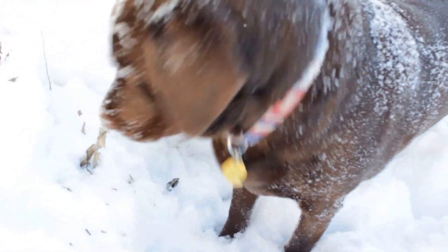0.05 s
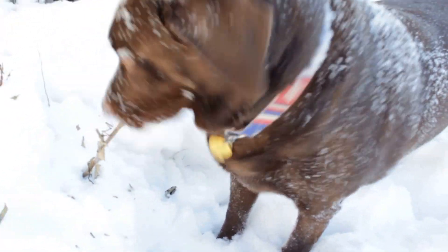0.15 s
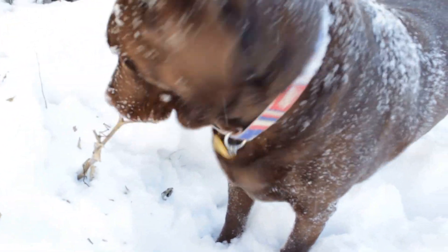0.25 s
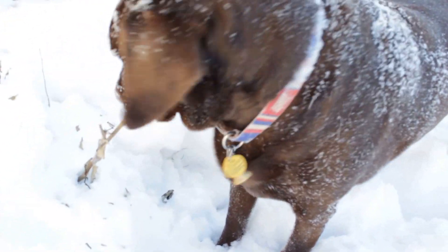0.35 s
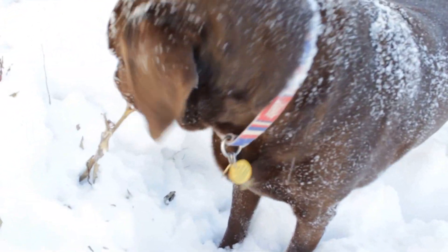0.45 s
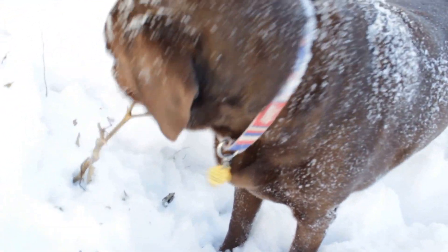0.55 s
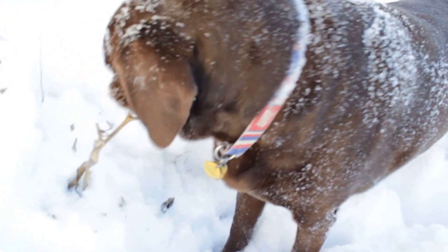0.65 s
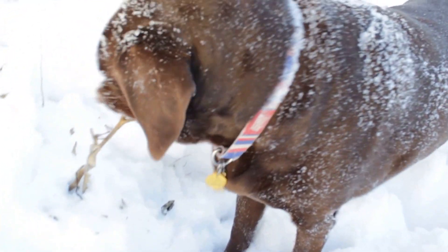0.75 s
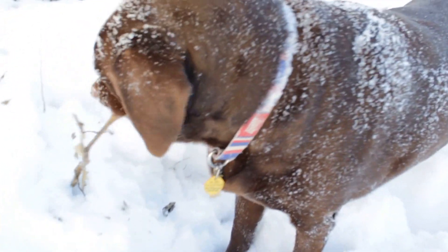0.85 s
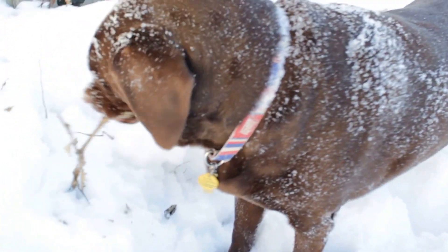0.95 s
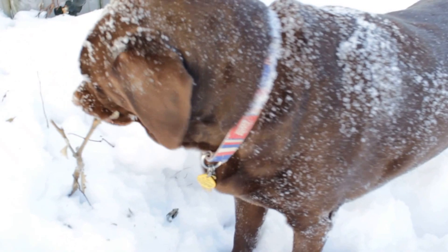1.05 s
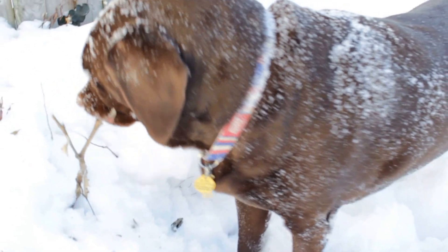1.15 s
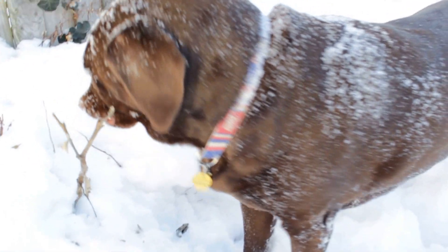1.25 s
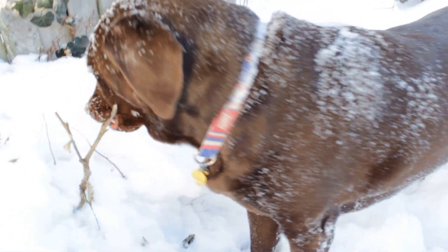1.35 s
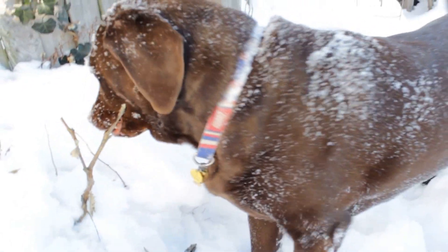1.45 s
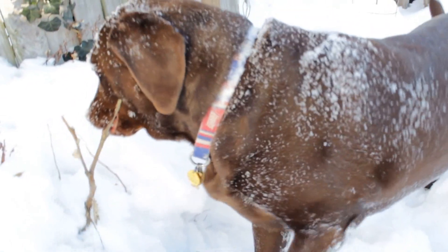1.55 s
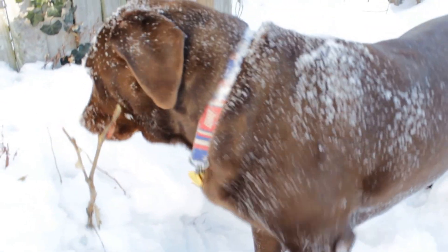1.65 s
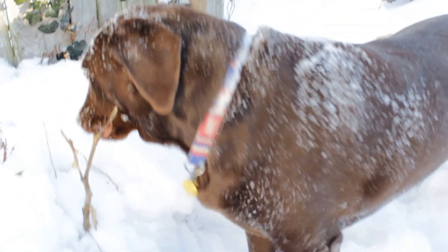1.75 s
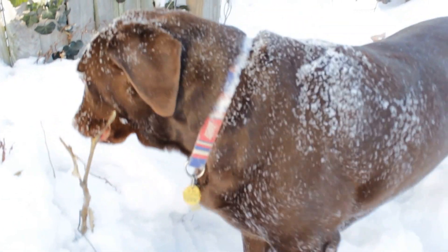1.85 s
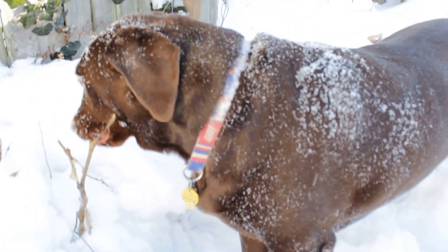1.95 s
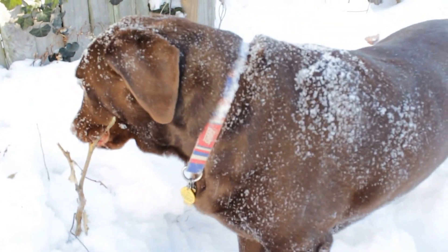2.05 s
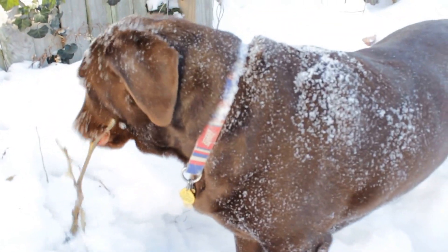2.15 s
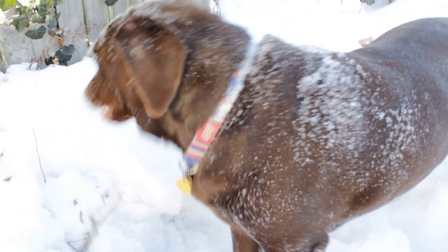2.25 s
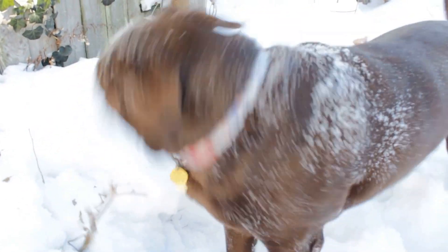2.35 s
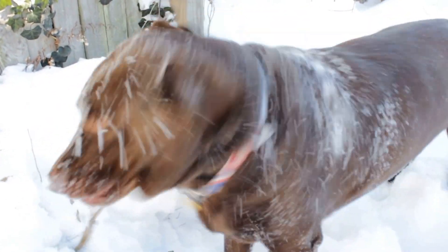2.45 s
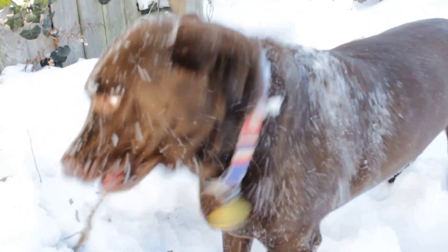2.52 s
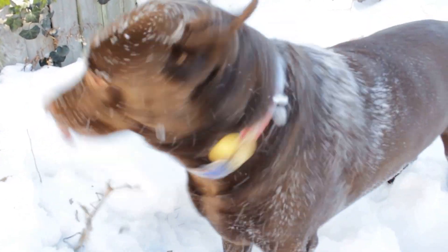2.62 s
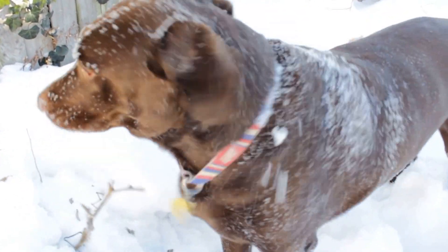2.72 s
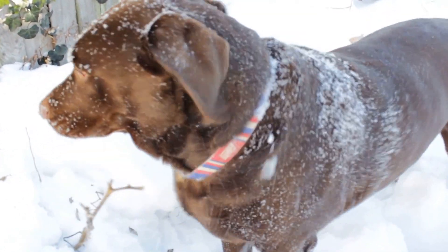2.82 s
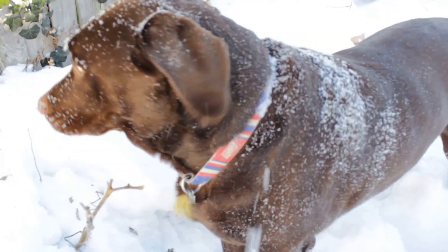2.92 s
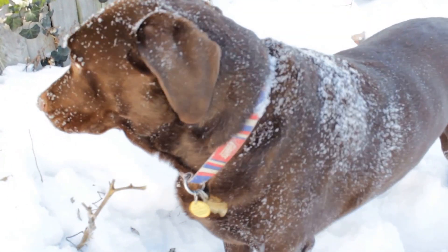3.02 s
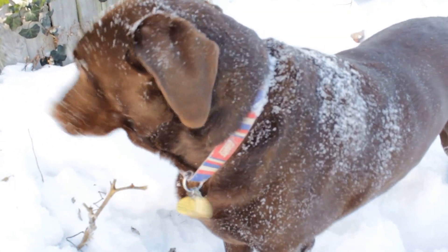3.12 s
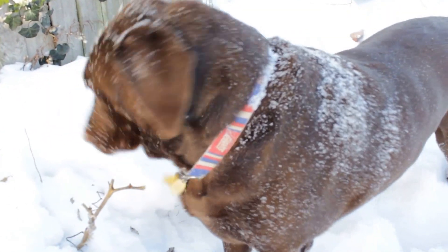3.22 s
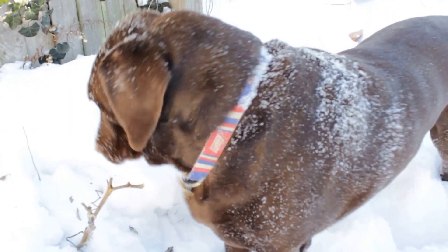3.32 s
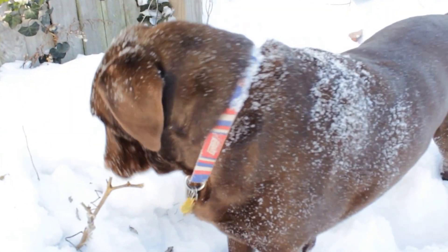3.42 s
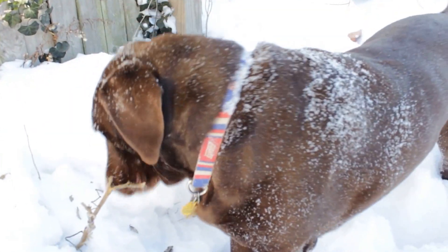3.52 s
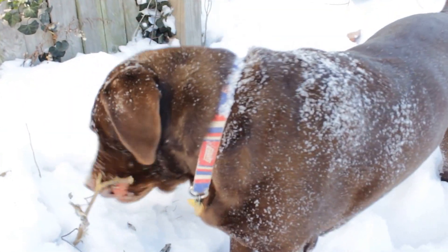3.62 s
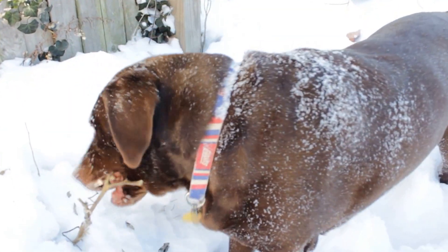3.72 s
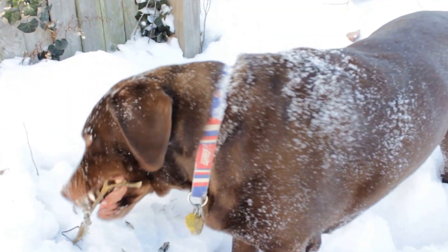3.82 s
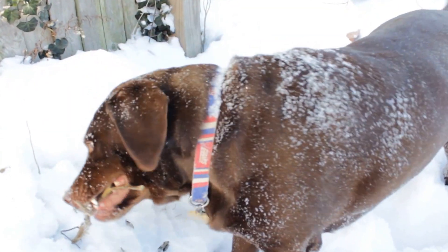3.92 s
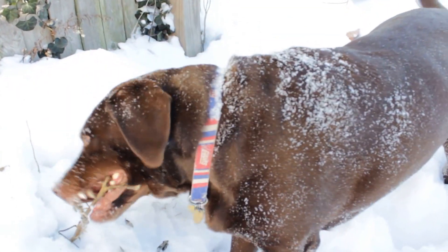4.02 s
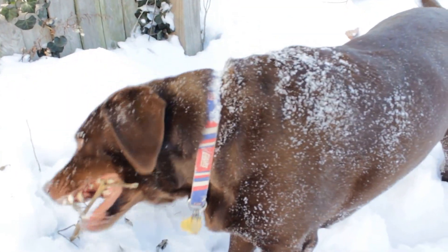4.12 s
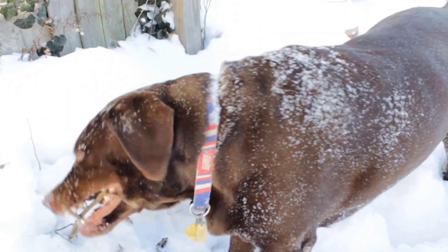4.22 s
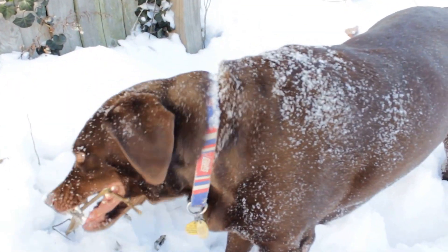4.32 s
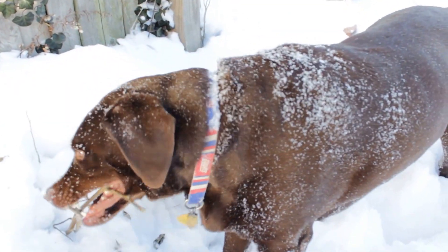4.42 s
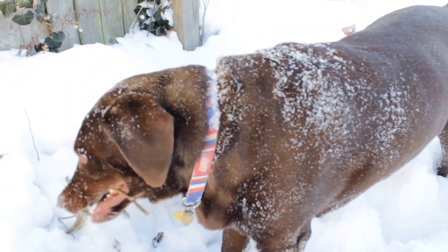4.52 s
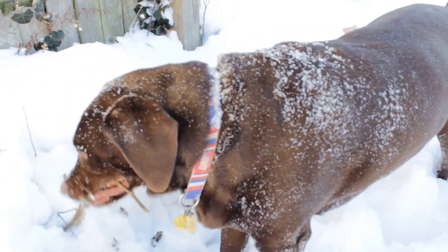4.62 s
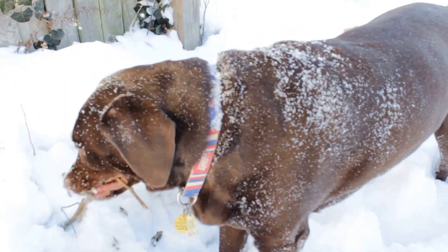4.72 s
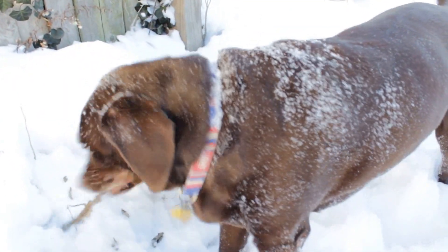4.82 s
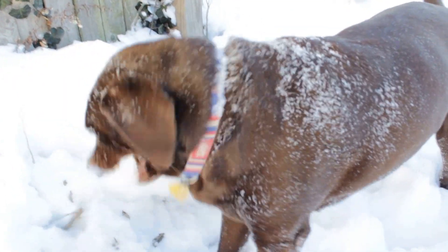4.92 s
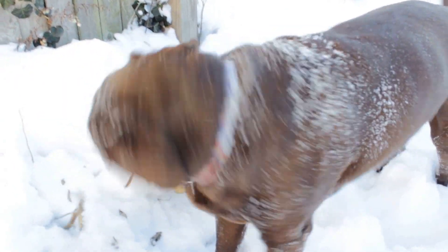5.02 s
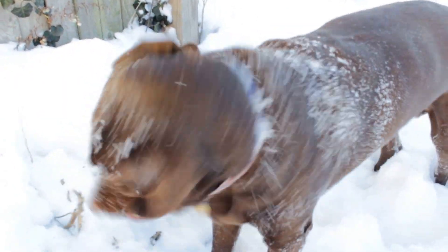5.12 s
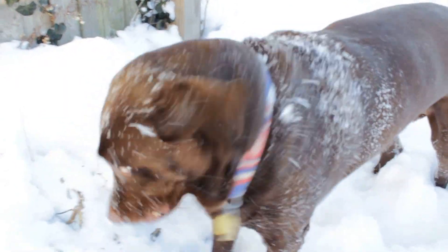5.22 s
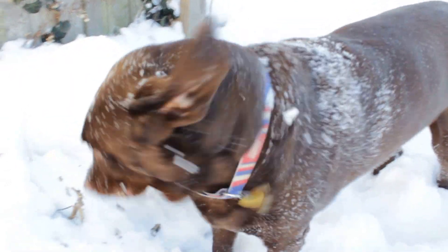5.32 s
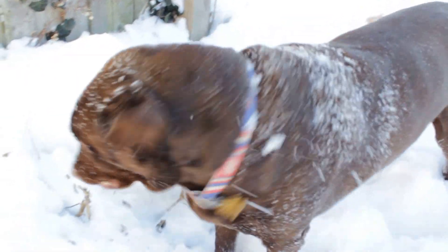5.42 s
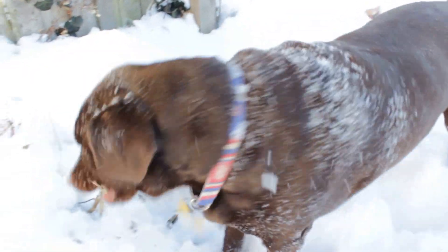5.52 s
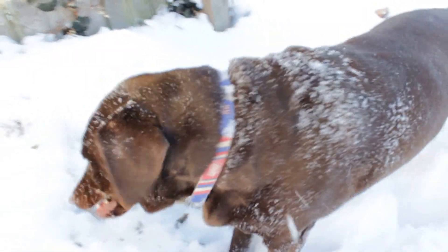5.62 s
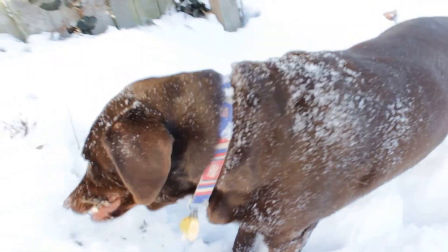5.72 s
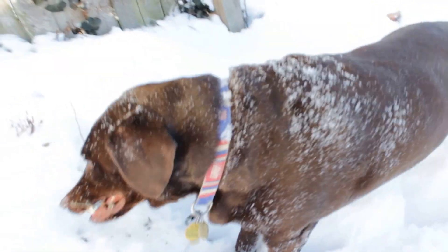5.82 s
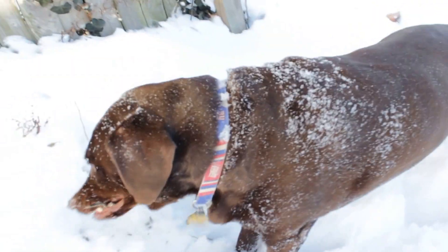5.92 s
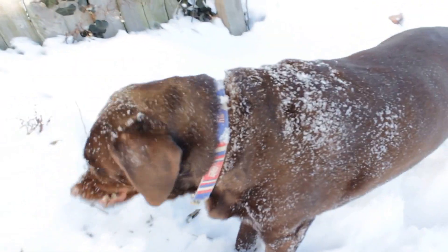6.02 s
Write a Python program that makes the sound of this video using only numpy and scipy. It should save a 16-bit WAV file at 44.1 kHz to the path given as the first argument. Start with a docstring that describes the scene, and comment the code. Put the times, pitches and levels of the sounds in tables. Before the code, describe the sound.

Metal collar tags jingle in bursts as a dog crunches and splinters a stick in a quiet yard.

```python
"""A dog chews a stick close by, in the hush of a snowy yard. First its jaws clop wetly and a toss of
the head sets the metal collar tags clinking and chattering. Wood snaps between its teeth, hard and
with a hollow knock at 1.6 s, and from 2.4 s the tags jangle at their loudest. After 4 s the stick
splinters in a run of cracks, soft thuds bump the microphone and the hush dips briefly.
One more jangle ends the scene."""
import sys
import numpy as np
from scipy import signal
from scipy.fft import rfft, irfft, next_fast_len
from scipy.io import wavfile
from scipy.ndimage import map_coordinates

SR = 44100
rng = np.random.default_rng(int(sys.argv[2]) if len(sys.argv) > 2 else 0)


def transcribe(u):
    """Save the signal u as a 16-bit wav file named by the first command-line argument.

    u: samples, shape (n,) or (channels, n), limited to [-1, 1]; the rate is SR.
    q: integer samples, one column per channel.
    """
    v = np.clip(np.atleast_2d(u).T, -1, 1)
    q = np.round(v * 32767).astype(np.int16)
    wavfile.write(sys.argv[1], SR, q)


N = 267230

# colours of the three bands of outdoor hush: freq_hz, gain_db
HUSH_LOW = [(15, -1.5), (35, -4.5), (62, 3), (95, -2), (125, -7), (190, -1), (330, -3.5), (450, -11.5),
            (900, -47)]
HUSH_MIDDLE = [(200, -16), (420, 1), (800, -0.5), (1400, -3.5), (2200, -9), (3500, -10.5), (8000, -41)]
HUSH_HISS = [(1000, -34.5), (2500, 2), (3500, 1.5), (6000, 1.5), (9000, -1), (15500, 1.5)]
# fader rides for the hush, drawn to dip after the hardest cracks, and its middle band: time_s, gain_db
HUSH_RIDE = [(0, 0), (1.45, 1), (1.65, -2), (2.05, 0), (2.65, -0.5), (3.6, .5), (4.29, 0), (4.45, -8.5),
             (4.8, -5), (4.96, -13.5), (5.1, -6.5), (5.4, 0.5), (6.06, -0.5)]
MIDDLE_RIDE = [(0, 1.5), (.8, -0.5), (1.3, 1.5), (2.2, -1), (2.42, 1), (2.7, -1.5), (4.9, 0.5), (5.4, 3.5),
               (6.06, 4)]
# a thin hiss near 3 kHz comes and goes: start_s, end_s, level_db
THIN_HISS = [(.55, 1.4, -58), (2.328, 2.806, -55.5), (3.2, 3.55, -56), (3.81, 4.25, -58)]
# wet jaw clops, plus hollow knocks under stick cracks and one thud: start_s, level_db, pitch_hz, t60_s
CLOPS_AND_KNOCKS = [(.184, -34, 1430, .018), (.568, -30.5, 1530, .025), (1.6245, -23, 854, 0.021),
                    (2.24, -13, 1490, 0.011), (2.516, -29.5, 680, 0.027), (2.565, -29.5, 835, 0.02),
                    (2.6262, -28.5, 1590, 0.05), (2.634, -27, 897, 0.046), (2.642, -21, 2000, 0.011),
                    (2.834, -26.5, 1410, .011), (3.7276, -23.5, 860, 0.032), (4.051, -38, 970, 0.049),
                    (4.1612, -17.5, 1037, 0.025), (4.193, -33.5, 1233, 0.04), (4.413, -25.5, 1090, 0.014),
                    (4.565, -36.5, 570, 0.025), (4.866, -15, 1003, 0.029), (5.141, -36, 995, 0.035),
                    (5.773, -34.5, 943, 0.085)]
# plate modes of the tags: pitch_hz, level_db, t60_s
TAG_MODES = [(5610, -9, 0.054), (5910, -2, 0.072), (7200, -5, 0.071), (9810, -18.5, 0.074),
             (10580, -4, 0.046), (11180, -16.5, 0.11), (11660, -10, 0.028), (12080, -7, 0.14),
             (11700, -2.5, 0.032), (12400, -3, 0.023), (13300, -8.5, 0.04), (13800, -14, .02),
             (13200, 5, .025), (14040, -4, 0.019), (14250, -10, 0.061), (14800, -16, .02),
             (15500, -10, 0.02)]
# colour of metal clicking on metal: freq_hz, gain_db
CLICK_COLOUR = [(500, -20), (1300, 3), (2500, 0.5), (3020, 10), (3230, 4), (3450, 6), (4200, -1.5),
                (7000, 1), (9000, -2), (12000, -7.5), (16000, -4)]
# the tags slide over each other: start_s, end_s, level_db, click_vs_ring_db
TAG_SLIDES = [(0.25, 0.353, -50.5, -13), (0.572, .61, -44, -7), (2.397, 2.47, -33.5, -13),
              (2.467, 2.531, -40, 0), (2.653, 2.68, -33, -11), (2.812, 2.866, -33.5, -5),
              (3.183, 3.219, -39.5, -6.5), (5.416, 5.5, -40, -13), (5.493, 5.592, -48.5, -10),
              (5.635, 5.705, -32, -15)]
# the collar swings and the tags touch lightly: start_s, end_s, level_db
COLLAR_SWINGS = [(0.253, .7, -49.5), (2.631, 3.09, -44.5), (3.166, 3.45, -48.5), (5.299, 5.6, -48.5)]
# featured knocks of tag on tag: start_s, ring_db, click_vs_ring_db, ping_vs_ring_db, contact_s
TAG_KNOCKS = [(0.2953, -39.5, -12, -22, .003), (0.3992, -36.5, -5, -13, 0.00042),
              (0.5243, -39.5, -14, -10, 0.00072), (0.5665, -40.5, 6, -3, 0.00037),
              (1.7597, -44, -9, -28, .0006), (1.8959, -46, -0.5, -20, .0006),
              (2.055, -44.5, -10, -28, .0006), (2.408, -29, -12, -29, .004), (2.4528, -29, -11, -26, .004),
              (2.4977, -23, -14, -23, .0006), (2.502, -27.5, -13, -27, .0006),
              (2.652, -21.5, -12, -31, 0.00073), (2.6608, -12.5, -12.5, -35, 0.00083),
              (2.6657, -14.5, -22, -37, .002), (2.7155, -29.5, -28, -23, .0006),
              (2.7854, -36, -10, -32, .0006), (2.804, -32.5, -8.5, -13, .0006),
              (2.8564, -45, -10, -14, .0006), (2.9706, -27.5, -17, -35, 0.0035),
              (3.0111, -18.5, -6, -11, 0.001), (3.0542, -44, 4, -18, .0006),
              (3.2097, -31, -24, -18, 0.00054), (3.2429, -30, -23, -22, 0.00074),
              (3.3625, -40, -18, -30, .0006), (3.3928, -42, -12, -29, .0006),
              (3.493, -24.5, -12.5, -29, 0.00055), (3.497, -29, -14, -35, .0007),
              (3.8683, -38, -10, -21, .005), (5.317, -37, -12, -27, .0006), (5.429, -42, 6, -10, .0006),
              (5.438, -35, 1, -13, .0006), (5.451, -29, -4.5, -12, 0.00079),
              (5.4656, -28.5, -30, -28, .004), (5.5, -36, -11, -13, .0006), (5.555, -28, -13, -38, 0.00041),
              (5.593, -43, 1.5, -30, .0006), (5.6328, -37, -0.5, -19, .0006),
              (5.6705, -25.5, -13.5, -10, 0.0004), (5.6855, -32.5, -15, -14, .003),
              (5.7839, -35, -7, -11, .0006), (5.9203, -42, -6, -24, .0006)]
# the steel loop holding the tags hits its hook: start_s, level_db, pitch_hz
LOOP_KNOCKS = [(.408, -33.5, 3370), (2.449, -30.5, 3090), (2.6606, -15.5, 2976), (2.677, -38, 3270),
               (2.857, -31.5, 3350), (2.914, -42, 3230), (3.011, -34, 3220), (3.078, -30.5, 3510),
               (3.2, -36, 3500), (5.43, -34, 3140)]
# the stick gives way in a crunch: start_s, end_s, level_db
STICK_CRUNCHES = [(0.569, 0.604, -43.5), (2.193, 2.238, -38.5), (2.237, 2.249, -28), (2.626, 2.645, -47),
                  (3.632, 3.7, -51), (3.858, 3.987, -57), (4.187, 4.436, -51.5), (4.891, 4.966, -52)]
# the loudest fibres break: start_s, snap_db, splinter_vs_snap_db, knock_vs_snap_db
STICK_CRACKS = [(0.9278, -36.5, -6.5, -25), (0.9364, -45, -8, -23), (0.9927, -43, -12, -8),
                (1.6236, -11.5, -15, -21.5), (2.192, -41, -1, -14), (2.1971, -35.5, 5, 4.5),
                (2.2075, -31, 4.5, -5), (2.2156, -34, -12, -13), (2.2396, -27, -8, -1.5),
                (2.245, -27, -7, -10), (2.2489, -25.5, -1.5, -22), (3.5334, -41, -22, -9),
                (4.2064, -38.5, -7, -6), (4.2623, -24.5, -5, -18), (4.2671, -27.5, -10, -21),
                (4.3083, -26.5, 0, -10), (4.3124, -20.5, -5.5, -11.5), (4.369, -39, -5, -17),
                (4.3763, -25, -7.5, -17.5), (4.4062, -31, -7, -17), (4.4108, -17.5, -5.5, -15.5),
                (4.4268, -22.5, -6, -13), (4.5323, -43.5, -7.5, -13), (4.668, -26, -4, -13),
                (4.7972, -34, -3, -15), (4.8123, -42, -8, -12), (4.819, -14.5, -0.5, -10.5),
                (4.8654, -10, -4.5, -11), (4.8722, -29.5, -13, -2.5), (4.883, -21.5, -4.5, -2.5),
                (5.1008, -45, -3, -8), (5.8995, -44.5, 9, 7.5)]
# colours of breaking wood (fine fibres, snap, ringing splinter, knock in the mouth): freq_hz, gain_db
FIBRE_COLOUR = [(100, -20.5), (300, 4.5), (800, -4.5), (1650, 0.5), (2500, -6), (4000, -1), (7000, -5.5),
                (16000, -10.5)]
SNAP_COLOUR = [(3000, -25), (6000, -10.5), (7500, -3.5), (10000, -1.5), (13500, 3.5), (16000, -2.5)]
SPLINTER_COLOUR = [(1500, -29), (2600, -16.5), (3400, 3.5), (4000, 1.5), (4700, 1), (5500, 1), (6500, 1.5),
                   (8500, -1.5), (14000, -38)]
KNOCK_COLOUR = [(80, -10), (200, 1.5), (600, -6), (980, -3), (1220, -4), (1550, 2.5), (2300, -0.5),
                (3300, -3), (8000, -18)]
# the jaws bear down and small fibres give: start_s, end_s, snap_db, fibres_per_s
JAW_BITES = [(2.186, 2.263, -39, 100), (3.919, 4.24, -51.5, 15.8), (4.282, 4.41, -46, 60),
             (4.55, 4.94, -49, 18), (5.001, 5.3, -57, 14)]
# soft bumps on the microphone: centre_s, peak_db, pitch_hz
BUMPS = [(4.462, -28.5, 168), (4.499, -23.5, 144), (4.567, -28, 260), (4.621, -25.5, 112),
         (4.691, -26, 120), (4.73, -19, 126), (4.801, -17.5, 97), (4.83, -18, 143)]
# fader ride for the rumble under the bumps: time_s, level_db
RUMBLE_RIDE = [(4.3, -72), (4.4, -38.5), (4.53, -48), (4.62, -36), (4.83, -34.5), (4.87, -61)]
# colour of the scatter off the fence: freq_hz, gain_db
FENCE_COLOUR = [(300, -6), (2500, -6.5), (9000, -9), (14000, -13)]


def amp(db):
    """Decibels to gain."""
    return np.exp(np.asarray(db) * np.log(10) / 20)


def decay(t, t60):
    """An envelope that falls 60 dB in t60 seconds."""
    return amp(-60 * t / t60)


def unit(x):
    """Scale to rms 1."""
    return x / np.sqrt(np.mean(x ** 2) + 1e-20)


def burst(x):
    """Scale a hit to rms 1 over its first 10 ms."""
    return x / np.sqrt(np.mean(x[:SR // 100] ** 2) + 1e-20)


def add(track, s, x):
    """Mix x into the track at time s."""
    part = track[max(round(s * SR), 0):][:len(x)]
    part += x[:len(part)]


def ride(points):
    """Join (time_s, gain_db) points into a fader curve in dB."""
    return np.interp(np.arange(N) / SR, *np.transpose(points))


def swell(start, end, fade_s):
    """A gain that fades in, holds and fades out between two times."""
    t = np.arange(N) / SR
    return np.sin(np.pi / 2 * np.clip(np.minimum(t - start, end - t) / fade_s, 0, 1))


def wobble(rate):
    """A smooth random curve, rate knots a second."""
    return map_coordinates(rng.standard_normal(int(N * rate / SR) + 4), [np.arange(N) * rate / SR])


def coloured(x, points):
    """Minimum-phase EQ through the (freq_hz, gain_db) points."""
    m = 2 * next_fast_len(len(x) // 2 + 512, real=True)
    hz, db = np.transpose(points)
    gain = amp(np.interp(np.log(np.fft.rfftfreq(m, 1 / SR) + 1), np.log(hz), db))
    cepstrum = irfft(np.log(gain))
    cepstrum[1:m // 2] *= 2
    cepstrum[m // 2 + 1:] = 0
    return irfft(rfft(x, m) * np.exp(rfft(cepstrum)), m)[:len(x)]


def noise(points):
    """Coloured noise of rms 1."""
    return unit(coloured(rng.standard_normal(N), points))


def puff(t, colour, t60, tail_db, tail_t60):
    """A coloured noise hit with a fast attack and a weaker, slower tail."""
    attack = 1 - np.exp(-(t / .00023) ** 2)
    envelope = attack * (decay(t, t60) + amp(tail_db) * decay(t, tail_t60))
    return burst(coloured(rng.standard_normal(len(t)) * envelope, colour))


def ticks(length, rate, spread_db):
    """Random impulses, about rate a second, scattered in level by spread_db."""
    impulses = (rng.random(length) < rate / SR) * rng.choice([-1, 1], length)
    return impulses * amp(spread_db * rng.standard_normal(length))


def moments(start, end, rate):
    """Up to 40 uneven times in a span, about rate a second."""
    slots = (np.arange(40) + rng.random(40)) / rate
    return start + slots[slots < end - start]


def yard():
    """The bed: three bands of outdoor hush, a thin grainy hiss and one soft swish."""
    hush_db = ride(HUSH_RIDE)
    low = amp(-46.5 + 1.34 * hush_db) * noise(HUSH_LOW)  # the bass dips deepest
    middle = amp(-50 + hush_db + ride(MIDDLE_RIDE) + .62 * wobble(14)) * noise(HUSH_MIDDLE)
    hiss = amp(-48.5 + .94 * hush_db) * noise(HUSH_HISS)
    grain_colour = [(1800, -35), (2600, -10.5), (3050, 0), (3500, -8), (4100, -18), (7000, -50)]
    grains = unit(coloured(ticks(N, rate=1500, spread_db=4), grain_colour))
    waver = amp(2.5 * wobble(12))
    thin = sum(amp(db) * swell(start, end, fade_s=.12) for start, end, db in THIN_HISS) * waver * grains
    swish_colour = [(400, -7), (1400, -4.5), (2300, -5), (4500, -2.5),
                    (5800, -6), (7200, -10), (15000, -16)]
    swish = amp(-49) * swell(start=.92, end=1.52, fade_s=.14) * noise(swish_colour)
    return low + middle + hiss + thin + swish


def clops_and_knocks():
    """A smack and a slightly rising ring: the opening mouth in a jaw clop, or a hollow knock."""
    out, t = np.zeros(N), np.arange(SR // 10) / SR
    attack = 1 - np.exp(-t / .00034)
    smack_colour = [(300, -19), (1200, -3.5), (4000, -15), (12000, -23)]
    for s, db, hz, t60 in CLOPS_AND_KNOCKS:
        phase = 2 * np.pi * hz * (t + 2.2 * t * t)
        hollow = (np.sin(phase) + amp(-13) * np.sin(2 * phase)) * decay(t, t60) * attack
        smack = puff(t, smack_colour, t60=.002, tail_db=-18, tail_t60=.031)
        add(out, s, amp(db) * (hollow + amp(-15.5) * smack))
    return out


def tag_ring(t):
    """Low, middle and top modes of a contact; the spot struck and the other tag's grip vary each time."""
    hz, db, t60 = np.transpose(TAG_MODES)
    size, shift, grip, phase = rng.standard_normal((4, len(hz)))
    db, hz, t60 = db + 4.5 * size, hz * (1 + .003 * shift), t60 * np.exp(.25 * grip)
    envelopes = amp(db[:, None]) * decay(t, t60[:, None])
    modes = envelopes * np.sin(2 * np.pi * (np.outer(hz, t) + phase[:, None]))
    band = np.digitize(hz, [9000, 13700])
    return [burst(modes[band == k].sum(0)) for k in range(3)]


def tag_chatter():
    """Sliding tags touch hundreds of times a second at three spots, their ring mostly choked."""
    out, t = np.zeros(N), np.arange(SR // 8) / SR
    catching = amp(3.5 * wobble(130))  # the tags catch and let go
    choke = decay(t, .035) + amp(-12)  # a small part rings on freely
    for start, end, db, click_db in TAG_SLIDES:
        length = max(round((end - start) * SR), SR // 100)
        pressure = (swell(start, end, fade_s=.0078) * catching)[round(start * SR):][:length]
        slide = 0
        for spot in range(3):
            low, middle, top = tag_ring(t)
            click = puff(t, CLICK_COLOUR, t60=.002, tail_db=-22, tail_t60=.02)
            ring = burst((middle + amp(-4) * top + amp(-15.5) * low) * choke)
            rubbing = pressure * ticks(SR // 4, rate=400, spread_db=3.5)[:length]
            slide = slide + signal.fftconvolve(rubbing, ring + amp(click_db) * click)
        add(out, start, amp(db) * slide / np.sqrt(np.sum(slide ** 2) / length + 1e-20))
    return out


def clink(db, click_db, ping_db, contact_s):
    """One contact clicks and rings the tags; a long rolling one softens the attack and damps the ring."""
    t = np.arange(SR // 8) / SR
    low, middle, top = tag_ring(t)
    attack = 1 - np.exp(-(t / contact_s) ** 2)
    # a hard knock throws the tags apart to ring freely; after a light one they stay pressed together
    free_t60 = np.interp(db, [-42, -22], [.07, .4])
    rolling_t60 = .067 * .0047 / contact_s
    envelope = attack * decay(t, free_t60) * decay(t, rolling_t60)
    punch = 1 + .99 * decay(t, .0043)
    top_db = -2.5 - rng.standard_normal()
    ring = burst((middle + amp(top_db) * top) * envelope * punch)
    click = puff(t, CLICK_COLOUR, t60=.0018 + 4 * contact_s, tail_db=-11, tail_t60=.036)
    ping = burst(low * envelope)
    return amp(db) * (ring + amp(click_db) * click + amp(ping_db) * ping)


def tag_touches():
    """While the collar swings, the tags tick lightly at random: nearly as much click as ring."""
    out = np.zeros(N)
    for start, end, db in COLLAR_SWINGS:
        for s in moments(start, end, rate=26):
            touch_db = db + .5 * rng.standard_normal()
            add(out, s, clink(touch_db, click_db=-3.5, ping_db=-14, contact_s=.0011))
    return out


def tag_clinks():
    """The tags knock together as the head moves."""
    out = np.zeros(N)
    for s, db, click_db, ping_db, contact_s in TAG_KNOCKS:
        add(out, s, clink(db, click_db, ping_db, contact_s))
    return out


def steel_loop():
    """The loop knocks on its hook: a close pair of modes, quickly damped by the collar."""
    out, t = np.zeros(N), np.arange(SR // 10) / SR
    envelope = decay(t, .029) * (1 - np.exp(-t / .0002))
    for s, db, hz in LOOP_KNOCKS:
        upper = np.sin(2 * np.pi * hz * t)
        lower = amp(.5) * np.sin(2 * np.pi * (.935 * hz * t + rng.random()))
        add(out, s, amp(db - 2) * (upper + lower) * envelope)
    return out


def crack(db, splinter_db, knock_db):
    """A break is a short snap, with a brief ring from the splinter and the mouth around it."""
    t = np.arange(SR // 16) / SR
    snap = puff(t, SNAP_COLOUR, t60=.0028, tail_db=-25, tail_t60=.022)
    pitch_hz = 3900 * np.exp(.195 * rng.standard_normal())  # every splinter has its own length
    twang = burst(np.sin(2 * np.pi * pitch_hz * t) * decay(t, .01))
    rasp = puff(t, SPLINTER_COLOUR, t60=.0026, tail_db=-21, tail_t60=.026)
    splinter = burst(rasp + amp(-13.5) * twang)
    knock = puff(t, KNOCK_COLOUR, t60=.002, tail_db=-8, tail_t60=.021)
    return amp(db) * (snap + amp(splinter_db) * splinter + amp(knock_db) * knock)


def stick():
    """The stick cracks between the teeth, and its finest fibres crunch."""
    out = np.zeros(N)
    for s, db, splinter_db, knock_db in STICK_CRACKS:
        add(out, s, crack(db, splinter_db, knock_db))
    for start, end, db in STICK_CRUNCHES:
        length = max(round((end - start) * SR), SR // 100)
        fibres = ticks(SR // 2, rate=5000, spread_db=0)[:length]
        add(out, start, amp(db) * unit(coloured(fibres, FIBRE_COLOUR)))
    return out


def bites():
    """Under the pressure of a bite, small fibres snap at uneven moments."""
    out = np.zeros(N)
    for start, end, db, rate in JAW_BITES:
        for s in moments(start, end, rate):
            add(out, s, crack(db, splinter_db=-2, knock_db=-6.5))
    return out


def thuds():
    """Each bump is one low push with a rebound on either side, over a brief rumble."""
    out, t = np.zeros(N), np.arange(N) / SR
    for s, db, hz in BUMPS:
        near = abs(t - s) < .03
        offset_squared = (np.pi * hz * (t[near] - s)) ** 2
        out[near] += amp(db) * (1 - 2 * offset_squared) * np.exp(-offset_squared)
    rumble = noise([(20, -6.5), (70, 7.5), (190, -1.5), (320, -13), (700, -32), (2000, -81)])
    return out + amp(ride(RUMBLE_RIDE)) * rumble


def scene():
    """Collar and mouth sit up front; snow soaks up their echo, bar a faint scatter from the fence."""
    bed = thuds() + yard()
    t = np.arange(SR // 4) / SR
    envelope = decay(t, .17) * (1 - np.exp(-t / .007))
    fence = coloured(rng.standard_normal(len(t)) * envelope, FENCE_COLOUR)
    close = (tag_clinks() + tag_chatter() + steel_loop() + stick()
             + clops_and_knocks() + tag_touches() + bites())
    echo = signal.fftconvolve(close, fence / np.linalg.norm(fence))[:N]
    return (close + amp(-29.5) * echo + bed)[None]


def record(dry):
    """A soft clip rounds the sharpest peaks at full scale; a steep low-pass trims the very top."""
    clipped = dry / (1 + np.abs(dry) ** 6) ** (1 / 6)
    m, cutoff_hz = next_fast_len(N + SR // 2), 15900
    lowpass = 1 / (1 + (np.fft.rfftfreq(m, 1 / SR) / cutoff_hz) ** 160)
    return irfft(rfft(clipped, m) * lowpass, m)[..., :N]


dry = scene()
out = record(dry)
transcribe(out)
```